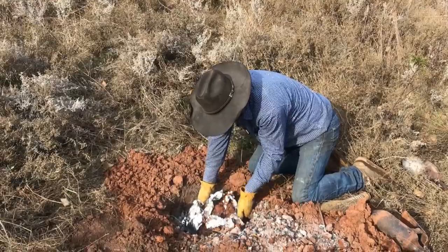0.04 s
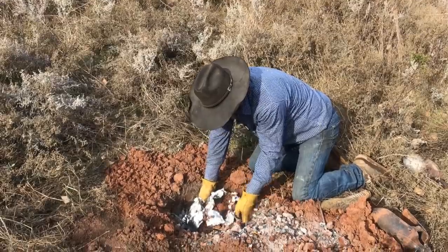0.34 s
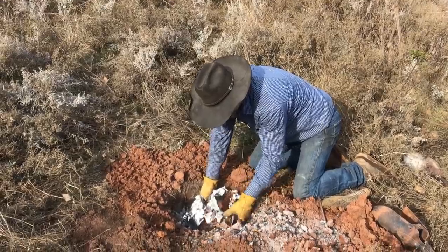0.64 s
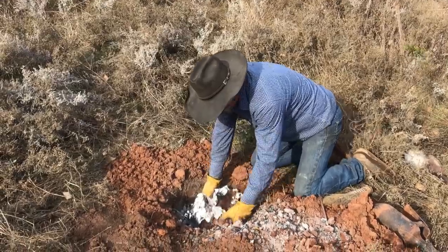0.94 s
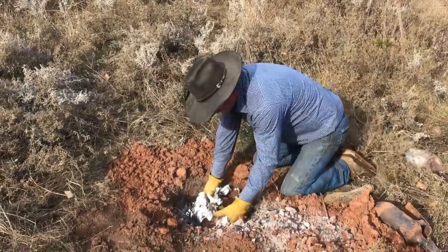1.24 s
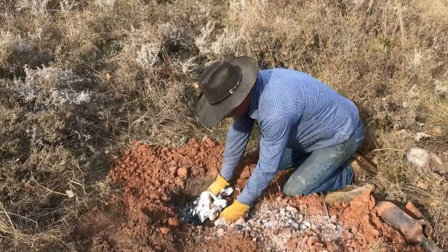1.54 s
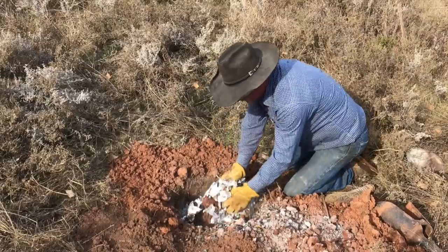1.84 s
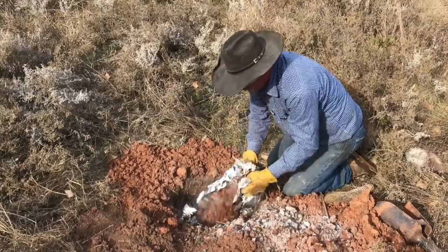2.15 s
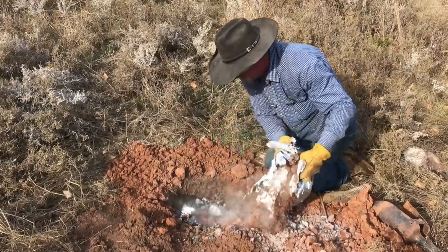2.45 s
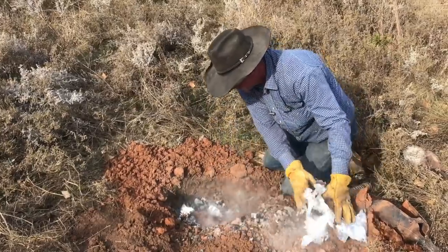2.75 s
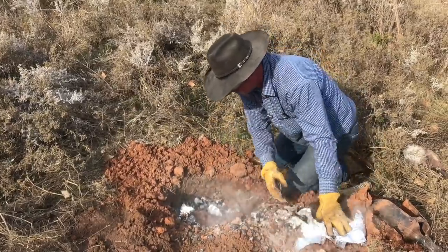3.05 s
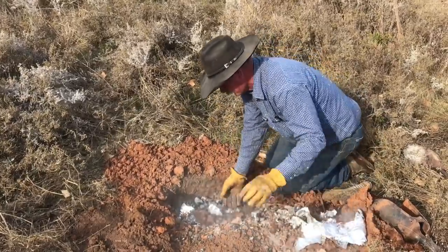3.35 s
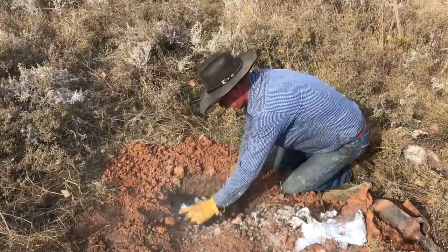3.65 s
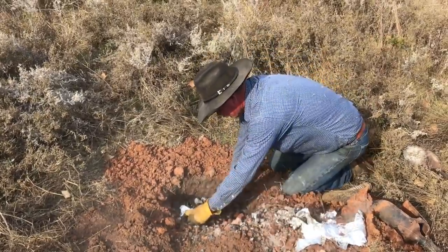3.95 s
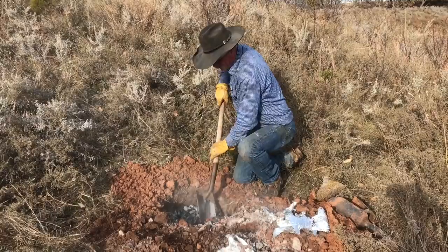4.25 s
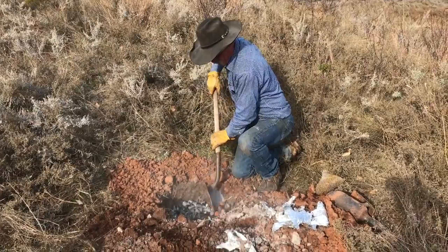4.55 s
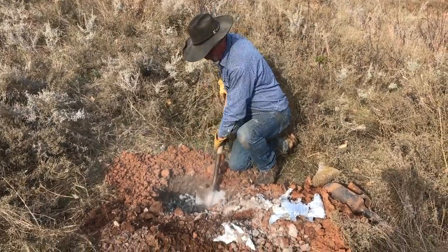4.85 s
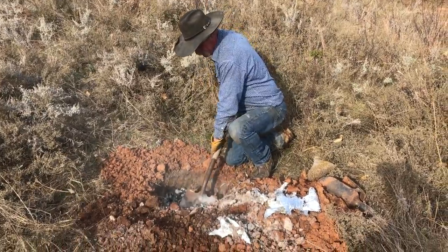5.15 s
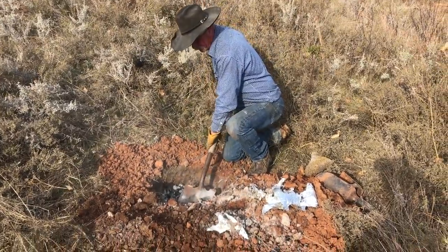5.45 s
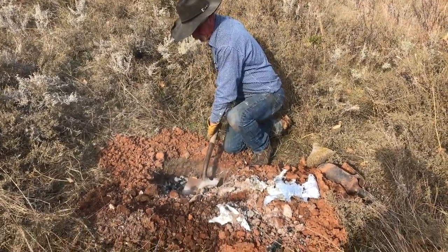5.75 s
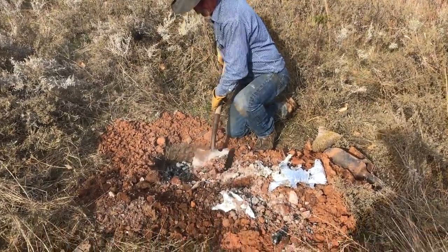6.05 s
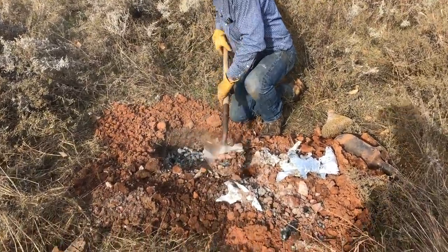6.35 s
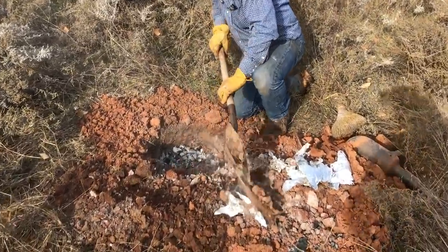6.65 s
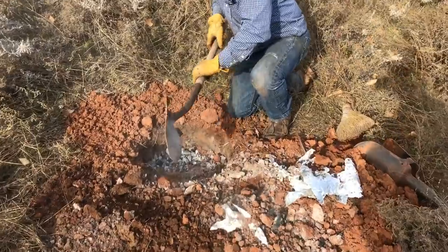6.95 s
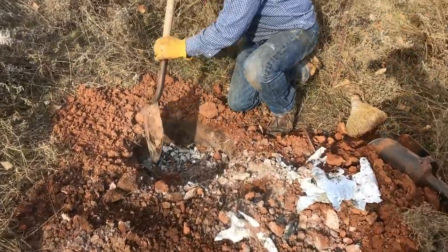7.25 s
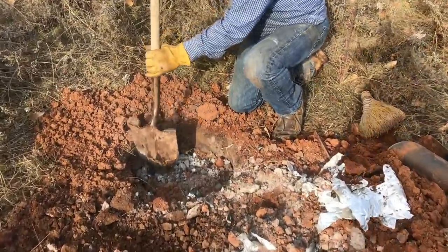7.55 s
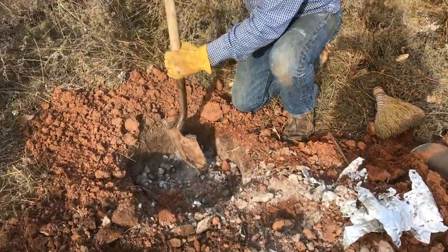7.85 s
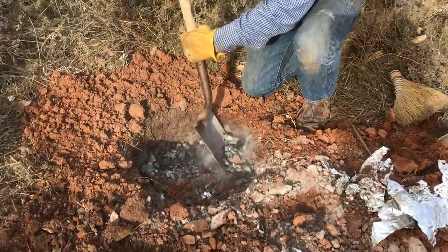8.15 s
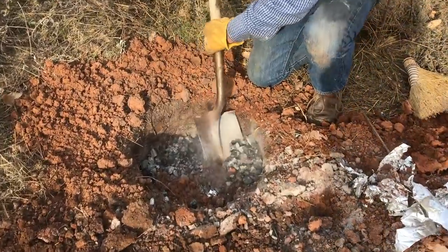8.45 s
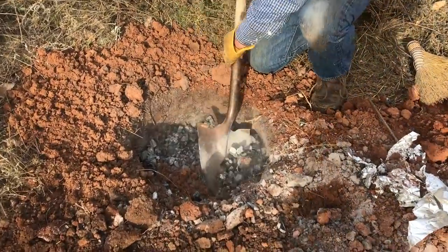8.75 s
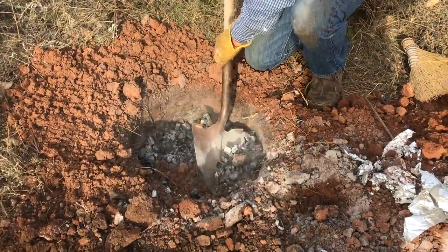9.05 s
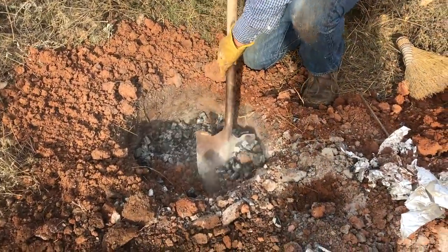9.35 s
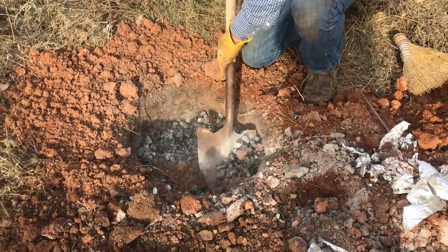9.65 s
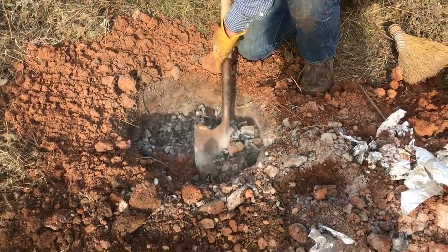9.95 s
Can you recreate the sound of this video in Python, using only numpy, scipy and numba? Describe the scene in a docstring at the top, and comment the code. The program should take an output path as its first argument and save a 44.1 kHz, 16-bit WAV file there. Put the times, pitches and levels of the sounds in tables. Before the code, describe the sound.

Hands pull crackling foil from a sandy pit before a shovel scrapes through cinders, stones clinking on its blade in light wind.

```python
"""Foil and a steel shovel at work in a cooking pit in dry grassland. Gloved hands drag the foil, loaded
with dirt, out of the pit, drop it and brush the ashes: it crinkles in tiny creases as sand runs over it.
Then the shovel scrapes, tips its load and digs into ash and cinders, which knock on the ringing blade.
Two closely spaced microphones stand a few metres away, nudged by light wind."""
import sys
import numpy as np
from scipy import signal
from scipy.fft import rfft, irfft
from scipy.io import wavfile
from scipy.ndimage import uniform_filter1d, map_coordinates
from numba import njit

SR = 44100
rng = np.random.default_rng(int(sys.argv[2]) if len(sys.argv) > 2 else 0)


def persist_wave(psi):
    """Save psi, clipped to +-1, as 16-bit WAV."""
    counts = np.round(np.clip(psi, -1, 1) * 32767).astype(np.int16)
    wavfile.write(sys.argv[1], SR, np.atleast_2d(counts).T)


N = 440559
T = np.arange(N) / SR
CONTACT_PER_S = 20  # how often the point of contact wanders on the blade


def undb(db):
    """Decibels to gain."""
    return 10 ** (np.asarray(db) / 20)


def during(start, end, fade=0.01):
    """One from start to end, with short fades outside."""
    return np.clip(np.minimum(T - start, end - T) / fade + 1, 0, 1)


def unit(x):
    """Scale to rms 1."""
    return x / np.sqrt(np.mean(x ** 2))


def colour(x, points, size=4096):
    """Causal filter whose gain follows points of f/Hz, level/dB."""
    hz, db = np.transpose(points)
    f = np.maximum(np.fft.rfftfreq(size, 1 / SR), 1)
    cepstrum = irfft(np.log(undb(np.interp(np.log(f), np.log(hz), db))))
    cepstrum[1:size // 2] *= 2  # fold to minimum phase
    cepstrum[size // 2 + 1:] = 0
    impulse = irfft(np.exp(rfft(cepstrum)))
    return signal.fftconvolve(x, impulse[None], axes=1)[:, :x.shape[1]]


def resonate(x, hz, width):
    """One resonance, gain 1 at its centre."""
    hz = min(hz, SR / 3)
    return signal.lfilter(*signal.iirpeak(hz, hz / min(width, SR / 3), fs=SR), x)


def soften(x, hz):
    """A soft or blunt contact holds little above this frequency."""
    return signal.sosfilt(signal.butter(3, min(hz, SR / 3), fs=SR, output="sos"), x)


def spread(x, points):
    """Set the stereo width by colouring the difference between the microphones."""
    side = colour((x[:1] - x[1:]) / 2, points)
    return x.mean(0) + np.vstack([side, -side])


def specks(size, lag_ms=.035, scatter_ms=.04):
    """Countless tiny contacts, each with its own lag at the right microphone: only the treble is wide."""
    push = rng.standard_normal(size)
    lag = np.rint((lag_ms + scatter_ms * rng.laplace(size=size)) * SR / 1000).astype(int)
    return np.array([push, np.bincount((np.arange(size) + lag) % size, push, size)])


def fractures(rate, spread_db, decay_ms):
    """Power of random small collapses, rate per second, each building up and dying away; mean 1."""
    chance, size = rng.random(N), rng.standard_normal(N)
    hit = chance < rate / SR
    power = np.zeros(N)
    power[hit] = undb(spread_db * np.clip(size[hit], -2, 2)) ** 2
    for ms in (decay_ms, decay_ms / 4):
        power = signal.lfilter([1], [1, -np.exp(-2 / (ms * SR / 1000))], power + 1e-18)
    return power / power.mean()


def crunch(points, collapse, rate, spread_db, decay_ms, shared):
    """Grains of many pitches: every band has its own collapses and shares the larger ones."""
    contacts, out = specks(N), 0
    for hz in np.geomspace(250, 11000, 7):
        power = shared * collapse + (1 - shared) * fractures(rate, spread_db, decay_ms)
        below = signal.lfilter(*signal.butter(1, hz, fs=SR), contacts)
        out = out + below * np.sqrt(power)
        contacts = contacts - below
    return unit(colour(out + contacts * np.sqrt(power), points))


def burst(rise_ms, decay_ms, size=8192):
    """A cluster of contacts that swells and dies away."""
    ms = 1000 * np.arange(size) / SR
    return specks(size) * np.minimum(ms / rise_ms, 1) * np.exp(-np.maximum(ms - rise_ms, 0) / decay_ms)


def add(track, s, db, sound):
    """Place a sound at a time with a peak level."""
    start = int(s * SR)
    part = track[:, start:start + sound.shape[1]]
    part += (undb(db) * sound / np.abs(sound.mean(0)).max())[:, :part.shape[1]]


def strokes(table, release_s, waver_per_s=18, waver_db=.7):
    """Gain of each layer: a stroke rises, swells or fades, then dies away; its layers waver together."""
    t, power = T[::32], 0
    for s, length, attack_s, db, swell_db, *relative_db in table:
        age = t - s
        hold = undb(db + swell_db * (np.clip(age / length, 0, 1) - .5))
        gain = np.clip(age / attack_s, 0, 1) * hold * np.exp(-np.maximum(age - length, 0) / release_s)
        power = power + np.outer(undb([0, *relative_db]), gain) ** 2
    waver = np.interp(t * waver_per_s, np.arange(len(t)), rng.standard_normal(len(t)))
    return np.array([np.interp(T, t, layer) for layer in np.sqrt(power) * undb(waver_db * waver)])


def hands(crinkle_gain, sand_gain, lumps_gain):
    """Foil buckles in tiny creases while sand runs over it and lumps of soil tumble."""
    # spectra of the three materials: f/Hz, level/dB
    foil_colour = [(300, -15), (600, -9), (900, -7.5), (1200, 3), (1650, 2), (2300, 1), (3200, 0),
                   (5000, -3), (7000, -5), (11000, -26)]
    sand_colour = [(2500, -3.5), (5000, -3.5), (7000, -3), (9000, 1), (10500, -1.5), (12500, -7.5),
                   (15000, -20.5)]
    soil_colour = [(60, -9.5), (180, -7.5), (300, -1), (430, -3), (600, -8), (1000, -12.5), (2500, -35)]
    # stereo width: f/Hz, side gain/dB
    width = [(200, 6), (700, 4.5), (1500, 0.5), (2800, -0.5), (6000, -1), (12000, 1)]
    collapse = fractures(rate=380, spread_db=4.5, decay_ms=21)
    foil = crunch(foil_colour, collapse, rate=300, spread_db=7, decay_ms=3.2, shared=.33)
    foil = undb(-2.4) * foil + rasp(foil)
    sand = crunch(sand_colour, collapse, rate=1500, spread_db=34, decay_ms=.32, shared=.73)
    soil = crunch(soil_colour, collapse, rate=220, spread_db=6, decay_ms=5, shared=.49)
    return spread(foil * crinkle_gain + sand * sand_gain + soil * lumps_gain, width)


def dust(stirred):
    """Dry dust sifts over foil and steel with a thin, bright fizz."""
    grains = specks(N, lag_ms=0, scatter_ms=.0053)
    grains *= np.sqrt(fractures(rate=640, spread_db=3.5, decay_ms=4.7))
    return stirred * unit(colour(grains, [(8000, -3.5), (11000, -.5), (13000, 4), (16000, -6)]))


def wind(breeze_db=-63):
    """Gusts and soft bumps rumble on both microphones alike; eddies strike each on its own."""
    # gusts over the breeze: t/s, length/s, attack/s, level/dB, swell/dB
    gusts = [(0, 1, 0.027, -45, 1), (.6, 0.8, 0.099, -39.5, -4), (1.5, 0.85, 0.14, -40.5, 9),
             (3.0, 0.59, 0.1, -45.5, -9), (3.6, 0.59, 0.066, -60, -4), (9.04, 0.95, 0.05, -59, -5)]
    # spectrum of the rumble: f/Hz, level/dB
    rumble_colour = [(15, -18), (30, -14), (55, 1.5), (95, -1.5), (160, -9.5), (300, -32), (1000, -54)]
    # eddies on the capsules: t/s, length/s, left level/dB, right level/dB
    buffets = [(0.85, 0.049, -29, -36), (1.24, 0.08, -31.5, -54), (2.562, 0.047, -22.5, -51),
               (2.668, 0.13, -24, -42), (2.771, 0.07, -22, -23), (2.862, 0.06, -25.5, -27),
               (2.935, 0.13, -51, -36), (3.182, 0.23, -59, -39.5), (6.558, .045, -53, -68)]
    churn = strokes(gusts, release_s=.07) ** 2 * fractures(rate=120, spread_db=2.5, decay_ms=14)
    bumps = undb(breeze_db) ** 2 * (1 + fractures(rate=7, spread_db=2.5, decay_ms=40)) / 2
    rumble = unit(colour(specks(N), rumble_colour)) * np.sqrt(uniform_filter1d(churn + bumps, size=256))
    eddy_colour = [(20, -10), (55, 3.5), (110, 0), (180, -11), (350, -19.5), (1000, -39)]
    eddies = unit(colour(rng.standard_normal((2, N)), eddy_colour))
    eddy_gain = sum(during(s, s + length, fade=.011) * undb([[left], [right]])
                    for s, length, left, right in buffets)
    return rumble + eddies * eddy_gain


def grass():
    """Dry grass hisses faintly around the pit."""
    # spectrum of the field: f/Hz, level/dB
    field_colour = [(59, -17), (100, -39), (300, 1), (386, -6.5), (1040, -9), (1370, -15.5), (2420, -7),
                    (4750, -12.5), (10200, -16.5), (15500, -17)]
    return undb(-63.5) * unit(colour(specks(N), field_colour))


def snaps(track):
    """Foil and grit give single sharp snaps."""
    # snaps: t/s, peak level/dB, f/Hz, decay/ms
    hits = [(0.072, -29, 2000, 4.6), (0.762, -22.5, 1400, 5), (0.846, -26, 1300, 8),
            (0.923, -23, 1460, 2.1), (1.029, -23.5, 1080, 9.3), (1.075, -22, 1540, 9),
            (1.127, -26, 1300, 4.6), (1.183, -23.5, 1460, 4.7), (1.33, -22, 1770, 6.8),
            (1.35, -29, 2500, 1.8), (1.397, -18, 1810, 1.6), (1.447, -24.5, 2300, 3.6),
            (1.564, -19, 5040, 12), (2.339, -15, 4000, 3.3), (2.553, -9, 2490, 3.7), (2.787, -23, 1900, 6),
            (3.088, -28.5, 2000, 3.3), (3.126, -25.5, 8850, 12), (3.208, -24, 7600, 6.4),
            (3.207, -26, 1700, 5.4), (3.277, -38, 4500, 7), (3.323, -40, 1250, 2.5), (3.393, -40, 2200, 2),
            (3.768, -27, 1800, 16), (4.009, -21, 3040, 2.8), (4.242, -34, 6000, 0.97),
            (4.274, -32, 10000, 16), (5.151, -37.5, 5800, 1.8), (5.249, -41, 9500, 6),
            (5.733, -45, 3500, 9), (6.012, -38.5, 3000, 3.8), (6.188, -44.5, 2850, 3.9),
            (6.258, -44.5, 2030, 4.8), (6.501, -35, 2740, 4), (6.634, -39.5, 3500, 5.7),
            (8.493, -24, 2800, 0.87), (8.566, -21.5, 8040, 2.3), (8.827, -40, 6000, 3),
            (8.923, -32, 10500, 18), (9.069, -45, 7000, 4), (9.402, -31, 3200, 3.7),
            (9.507, -32.5, 10400, 2.3)]
    for s, db, hz, decay_ms in hits:
        snap = resonate(burst(1.2, decay_ms), hz, .79 * hz)
        add(track, s, db, resonate(snap, hz, 3 * hz))


def thuds(track):
    """The foil bundle, loaded with dirt, knocks dully; later clods fall or break; soft soil takes the edge off
    each blow."""
    # dull knocks of the loaded foil, then clods: t/s, peak level/dB, f/Hz
    falls = [(.072, -24.5, 414), (.168, -25, 338), (.194, -27, 368), (.23, -26, 380), (0.251, -31, 420),
             (.444, -29.5, 280), (.518, -29, 420), (0.546, -26, 387), (0.634, -32, 228), (0.681, -25, 384),
             (0.732, -25.5, 425), (.753, -25, 420), (0.772, -22, 302), (0.833, -26.5, 324),
             (.852, -25, 360), (.884, -23, 360), (1.006, -25.5, 330), (1.027, -25, 352), (1.127, -23, 400),
             (1.179, -23, 258), (1.327, -21, 335), (1.401, -26.5, 250), (2.524, -15, 430),
             (3.131, -29, 412), (3.208, -37, 450), (3.24, -34.5, 700), (5.28, -45, 335), (7.462, -29, 332),
             (7.634, -28, 320), (7.697, -24, 414), (8.043, -32.5, 397), (8.145, -33.5, 280),
             (8.223, -29, 258), (8.246, -38, 330), (8.518, -23.5, 234), (8.703, -36.5, 228),
             (8.923, -39, 330)]
    for s, db, hz in falls:
        thud = resonate(burst(rise_ms=1.8, decay_ms=4.5), hz, .45 * hz)
        add(track, s, db, soften(thud, 1.35 * hz))


def thumps(track, rise_ms=4.5):
    """Hands, knees and boots push softly and heavily on the ground: a few low swings each."""
    # thumps: t/s, peak level/dB, f/Hz
    pushes = [(.773, -23, 119), (.838, -34, 125), (0.871, -25, 129), (1.029, -25, 130), (1.185, -24, 144),
              (2.974, -28, 65), (3.222, -26, 75), (3.304, -36, 70), (3.353, -27, 80), (3.795, -43, 80),
              (5.796, -41, 57.5), (6.358, -50, 70), (6.439, -43, 60), (9.053, -41.5, 120), (9.72, -40, 100)]
    t = T[:8192]
    age = 1000 * t / rise_ms
    for s, db, hz in pushes:
        swing = age * np.exp(-age) * np.sin(2 * np.pi * hz * t)
        add(track, s, db, np.tile(swing, (2, 1)))


@njit
def sweep(x, hz, width):
    """One resonance whose centre moves, gain 1 at the centre."""
    y, band, low = np.empty(len(x)), 0., 0.
    for i in range(len(x)):
        g, k = np.tan(np.pi * hz[i] / SR), width / hz[i]
        v = (band + g * (x[i] - low)) / (1 + g * (g + k))
        band, low, y[i] = 2 * v - band, low + 2 * g * v, k * v
    return y


def rasp(foil, width_hz=400.):
    """A sheet dragged over soil rings hollow, rising in pitch as it is pulled taut."""
    # drags: start t/s, end t/s, start f/Hz, end f/Hz, gain/dB
    drags = [(1.577, 1.806, 1420, 1970, 0.5), (2.127, 2.283, 950, 1340, -3),
             (2.486, 2.82, 1810, 2180, -2.5), (3.62, 4.186, 1520, 1870, -5.5)]
    out = np.zeros((2, N))
    for start, end, from_hz, to_hz, db in drags:
        hz = np.interp(T, [start, end], [from_hz, to_hz])
        gain = during(start, end, fade=.0095)
        on = gain > 0
        hollow = np.array([sweep(side[on], hz[on], width_hz) for side in foil])
        out[:, on] += undb(db) * gain[on] * hollow
    return out


def blade(x, s, damping=1, sustain=1):
    """The blade rings with what touches it at time s; sinking into ash turns its clang hollow."""
    # resonances of the steel: f/Hz, width/Hz, level free/dB, level buried/dB
    modes = [(251, 33, -12, -3), (785, 61, -13, 3), (920, 23, -5, -7), (1230, 51, 0, -4.5),
             (1390, 100, 0, -2), (1580, 49, 2, 0.5), (1704, 25, 13, -19), (2085, 55, 0, 2),
             (2610, 91, -18, 1.5), (3040, 26, 2, 9.5), (3220, 73, -8, 7), (3497, 80, 10, 8),
             (3640, 22, 2, -13), (3780, 20, 4, 2), (4140, 64, 3.5, 6), (4780, 34, 3.5, -13),
             (5180, 21, -1, 3), (5660, 20, 2.5, 4), (7030, 22, 4.5, 4), (7950, 18, 2, -2),
             (8270, 25, 14, -2), (8800, 31, 7, 3), (9560, 13, 21, 8)]
    # ash lying against the blade: t/s, depth/0-1
    burial = [(4.35, 0.5), (4.6, 1), (7.4, 0.47), (7.64, 0), (7.79, 0.9), (7.89, 0), (8.15, 1), (9.68, 1)]
    moments = np.arange(0, T[-1], 1 / CONTACT_PER_S)
    depth = damping * np.clip(np.interp(moments, *np.transpose(burial)), 0, 1)
    out = 0
    for hz, width, free, buried in modes:
        contact = undb(3.5 * rng.standard_normal(len(moments)))  # each contact favours other modes
        gain = (undb(free) * (1 - depth) + undb(buried) * depth) * contact
        out = out + np.interp(s, moments, gain) * resonate(x, hz, width / sustain) * np.sqrt(sustain)
    return out


def bend(x, pitch_share=.004):
    """The changing load on the blade makes its pitch waver."""
    moments = np.arange(0, T[-1], 1 / CONTACT_PER_S)
    load = np.interp(T, moments, rng.standard_normal(len(moments)))
    lag_s = load * pitch_share / CONTACT_PER_S / np.sqrt(2)
    return np.array([map_coordinates(side, [(T - lag_s) * SR], order=3, mode="mirror") for side in x])


def shovel(grit_gain, ash_gain, scrape_gain, lumps_gain):
    """The blade sticks and slips through cinders; grit and ash slide over it and lumps shift ahead."""
    # spectra of the loose materials: f/Hz, level/dB
    grit_colour = [(900, -38), (1900, -2), (2500, 3), (3300, 1), (4500, 3.5), (6500, 0.5), (9000, -3),
                   (15000, -70)]
    ash_colour = [(4000, -11.5), (7000, -10), (9000, 6), (10500, 5), (12500, -2), (15500, -44)]
    lumps_colour = [(60, -12.5), (170, -5.5), (250, -2.5), (340, -1.5), (470, -4), (650, -7), (1200, -11),
                    (3000, -46)]
    cinder_colour = [(300, -10), (700, 3.5), (1700, 4.5), (3500, -14), (8000, -21)]
    # stereo width: f/Hz, side gain/dB
    width = [(200, 12), (700, -3), (1500, 1), (2600, 3.5), (4500, -1.5), (7500, 4), (10000, -3),
             (12500, -4)]
    slips = fractures(rate=190, spread_db=3.5, decay_ms=7)
    cinders = crunch(cinder_colour, slips, rate=400, spread_db=7, decay_ms=1.5, shared=.7)
    scrape = unit(blade(cinders, T) + undb(-2) * cinders)
    grains = crunch(grit_colour, slips, rate=350, spread_db=2, decay_ms=3, shared=.45)
    # now and then a coarser cinder skips over the steel
    hops = fractures(rate=45, spread_db=3, decay_ms=2.5)
    skips = unit(colour(specks(N) * np.sqrt(hops), [(500, 1), (1600, -27), (12000, -8)]))
    grains = grains + undb(-7.5) * skips
    grit = unit(grains + undb(-1) * blade(grains, T))
    powder = crunch(ash_colour, slips, rate=600, spread_db=8, decay_ms=4.5, shared=.8)
    ash = unit(powder + undb(-13) * blade(powder, T))
    clumps = crunch(lumps_colour, slips, rate=200, spread_db=5, decay_ms=6.3, shared=.08)
    lumps = unit(clumps + undb(-5.5) * blade(clumps, T))
    steel = bend(scrape * scrape_gain + grit * grit_gain)
    soil = ash * ash_gain + lumps * lumps_gain
    return spread(steel + soil, width)


def trickle():
    """Loose soil keeps trickling while the shovel is at work: a faint, steady gain for each layer."""
    # time at work: start t/s, end t/s
    span = (4.27, 10)
    # level/dB of grit, ash, scrape, lumps, dust
    levels = (-77, -66.5, -83, -69, -81)
    return np.outer(undb(levels), during(*span))


def clinks(track):
    """The bare edge strikes a stone; the free blade rings longer than a scraped one."""
    # strikes: t/s, peak level/dB, centre of the click f/Hz
    strikes = [(4.274, -35, 9300), (4.297, -29.5, 5060), (4.305, -42, 3600), (4.473, -40.5, 3700),
               (4.625, -57, 3020), (5.255, -49, 3050), (7.569, -30.5, 4790), (7.632, -30, 1710),
               (7.64, -30, 3520), (7.698, -34, 3560), (7.812, -26, 3540), (7.884, -23, 1680),
               (8.06, -26.5, 4500), (8.066, -33, 3480), (8.482, -32, 3550), (9.232, -47, 3720),
               (9.294, -45, 2900), (9.578, -39.5, 3020)]
    for s, db, hz in strikes:
        edge = resonate(burst(rise_ms=4, decay_ms=5), hz, .2 * hz)
        add(track, s, db, blade(edge, s, damping=0, sustain=1.7) + undb(-12) * edge)


def knocks(track):
    """Cinders and stones knock bluntly on the blade and set it ringing."""
    # knocks: t/s, peak level/dB, f/Hz
    hits = [(4.522, -32, 1040), (4.62, -38, 1050), (4.705, -40, 1390), (5.283, -47, 850),
            (5.523, -47, 1000), (5.553, -42, 1090), (5.791, -42.5, 910), (5.944, -44.5, 745),
            (6.047, -46, 900), (6.077, -40.5, 834), (7.538, -35, 1370), (7.798, -21.5, 1200),
            (8.041, -25, 900), (8.142, -29, 850), (8.162, -28.5, 1260), (8.222, -32, 764),
            (8.516, -25, 800), (8.547, -32, 850), (8.607, -29, 1400), (8.783, -34, 1370),
            (8.874, -35.5, 1080), (8.923, -35, 1070), (8.998, -42, 1380), (9.117, -24.5, 1220),
            (9.165, -31, 1590), (9.291, -32.5, 1460), (9.402, -24.5, 1500), (9.453, -33, 1570),
            (9.578, -38, 1430)]
    for s, db, hz in hits:
        stone = soften(resonate(burst(rise_ms=1.2, decay_ms=4.8), hz, .5 * hz), 1.5 * hz)
        add(track, s, db, blade(stone, s) + undb(-5) * stone)


def chops(track):
    """The blade chops in: the edge touches first, then the ash gives way and trickles on."""
    # cuts into the ash: t/s, peak level/dB, rise/ms, decay/ms
    cuts = [(7.45, -25.5, 13.4, 28), (7.684, -20, 12.4, 12), (8.512, -28, 8.8, 14), (9.7, -22.5, 19.3, 29),
            (9.878, -29.5, 15, 36)]
    # spectrum of a cut: f/Hz, level/dB
    cut_colour = [(60, 4), (270, 5.5), (550, 2.5), (1300, 4), (2100, -1.5), (3400, 0.5), (6500, -5.5),
                  (9500, -3), (16000, -13)]
    for s, db, rise_ms, decay_ms in cuts:
        touch = undb(-5.5) * burst(.49, 5.1)
        give = burst(rise_ms, decay_ms)
        tail = undb(-21) * burst(30, 91)
        cut = colour(touch + give + tail, cut_colour)
        add(track, s, db, cut + undb(-5.5) * blade(cut, s))


def pit(x):
    """Hard earth throws each sound back within a few milliseconds."""
    # echoes off the ground and the pit walls: delay/ms, level/dB
    echoes = [(1.3, -32), (2.9, -34), (4.7, -25.5)]
    return x + sum(undb(db) * np.pad(x, ((0, 0), (int(ms * SR / 1000), 0)))[:, :N] for ms, db in echoes)


def scene():
    """Hands, then shovel, stir up dust in the pit, a little to the left of the microphones."""
    # the hands grip, drag, lift and lay down the foil, then brush the ashes:
    # t/s, length/s, attack/s, crinkle level/dB, swell/dB, then re crinkle: sand/dB, lumps/dB, dust/dB
    hand_moves = [(-.02, 0.28, 0.06, -36, -0.5, -4.5, -5, -17), (.27, 0.15, 0.021, -43, 5.5, -4, -3, -12),
                  (.43, 0.85, 0.021, -36.5, 1, -2.5, -3, -10.5), (1.31, 0.14, 0.031, -34, -6, 2.5, -5, -17),
                  (1.45, 0.069, 0.028, -35.5, 9, -3.5, -8.5, -14),
                  (1.52, 0.24, 0.034, -29.5, 0.5, 0.5, -5, -8.5),
                  (1.79, 0.17, 0.029, -29.5, 3.5, -2, -4, -11),
                  (1.98, 0.68, 0.017, -29.5, 3.5, -1, -0.5, -14.5),
                  (2.31, 0.082, 0.015, -25.5, 6, -2.5, -30, -20),
                  (2.67, 0.26, 0.0093, -32, -2, -4, -5.5, -15), (2.98, 0.65, 0.1, -49, -25, 0, -4.5, -8.5),
                  (3.58, 0.17, 0.0065, -43, 1.5, -7, -9.5, -19),
                  (3.755, 0.48, 0.016, -39.5, 6.5, 1, -7.5, -15),
                  (3.865, 0.031, 0.022, -39.5, -3, 0, -14, -16)]
    # the shovel scrapes, tips its load and digs:
    # t/s, length/s, attack/s, grit level/dB, swell/dB, then re grit: ash/dB, scrape/dB, lumps/dB, dust/dB
    shovel_moves = [(4.265, 0.17, 0.026, -50.5, -15, 7, -9, -3.5, -16),
                    (4.43, 0.085, 0.03, -50.5, -10, -6, -16, -10, 0),
                    (4.523, 0.67, 0.0058, -55, -3, 0.5, -3.5, 0.5, -3.5),
                    (4.85, 0.18, 0.062, -45.5, -10, 1, -4.5, -6.5, -5),
                    (5.243, 0.046, 0.0059, -56, 5.5, 7, -4.5, 1.5, -2),
                    (5.33, 0.23, 0.052, -63, 11, -4, -3.5, -4, -9),
                    (5.62, 0.27, 0.11, -73.5, -11, -2, 10.5, -8, 7),
                    (5.88, 0.28, 0.083, -60, -11, -2, -3, -4.5, -4),
                    (6.09, 0.35, 0.034, -67.5, 4, -7, -10, 0.5, -1),
                    (6.45, 0.16, 0.0055, -57, 0, -2, -4, -18, -2),
                    (6.62, 0.47, 0.018, -57, -15, -16, -13, -26, -1.5),
                    (7.17, 0.27, 0.066, -64, 22, -9, -1, -0.5, 1),
                    (7.53, 0.57, 0.035, -41, -3.5, -4, -2, -4, -7.5),
                    (7.605, 0.14, 0.022, -37, -7, -18, -2, 0, -24),
                    (7.797, 0.071, 0.011, -35.5, -1, -11, -9, -4, -12),
                    (7.845, 0.056, 0.018, -30, -5.5, -10, -7, -4.5, -14),
                    (8.09, 0.43, 0.036, -46.5, -1.5, -1, -1, 1.5, -2),
                    (8.48, 0.12, 0.031, -40, 0, 1, -2, -4, -4.5),
                    (8.61, 0.18, 0.089, -43.5, -14, -12, -2.5, -7.5, -0.5),
                    (8.8, 0.25, 0.049, -55, 5.5, 2.5, 1.5, 1.5, -5),
                    (9.06, 0.14, 0.012, -41.5, 7, 0, 0.5, -4, -7),
                    (9.21, 0.25, 0.022, -47, 1, -8, -3.5, -5.5, -7),
                    (9.5, 0.15, 0.011, -58, 14, -3, -2, 1.5, -9), (9.77, .2, .04, -68.5, -10, -7, 3, 1, -3)]
    *by_hand, hand_dust = strokes(hand_moves, release_s=.061)
    *by_shovel, shovel_dust = np.hypot(strokes(shovel_moves, release_s=.016), trickle())
    work = hands(*by_hand) + shovel(*by_shovel) + dust(hand_dust + shovel_dust)
    for add_blows in (snaps, knocks, clinks, thumps, chops, thuds):
        add_blows(work)
    return (pit(work) + wind() + grass()) * undb([[.9], [-.9]])


def record(dry, top_hz=15900):
    """The microphones lift the treble, each a little differently; the recorder cuts the very top."""
    # the level dips briefly before the shovel starts: t/s, half width/s
    dip = (4.26, .014)
    left = colour(dry[:1], [(1000, .51), (4000, .11), (8000, 3.3), (12000, 2.1)])
    right = colour(dry[1:], [(1000, .11), (4000, .14), (8000, 3.4), (12000, 3.7)])
    gain = np.minimum(np.abs(T - dip[0]) / dip[1], 1)
    lowpass = signal.ellip(10, .2, 80, top_hz, fs=SR, output="sos")
    return signal.sosfilt(lowpass, gain * np.vstack([left, right]))


dry = scene()
out = record(dry)
persist_wave(out)
```